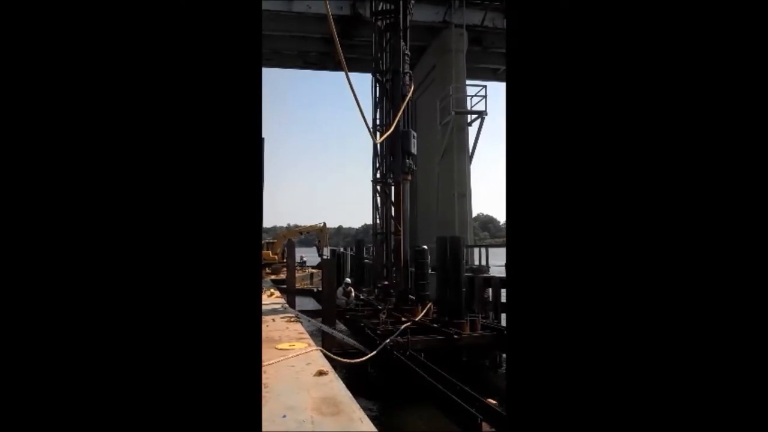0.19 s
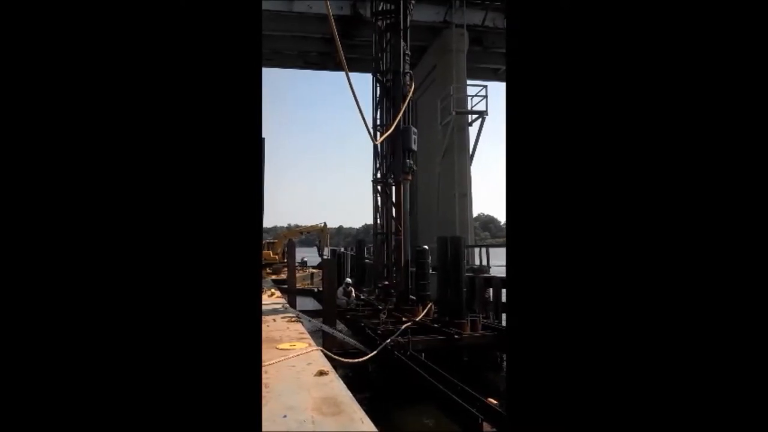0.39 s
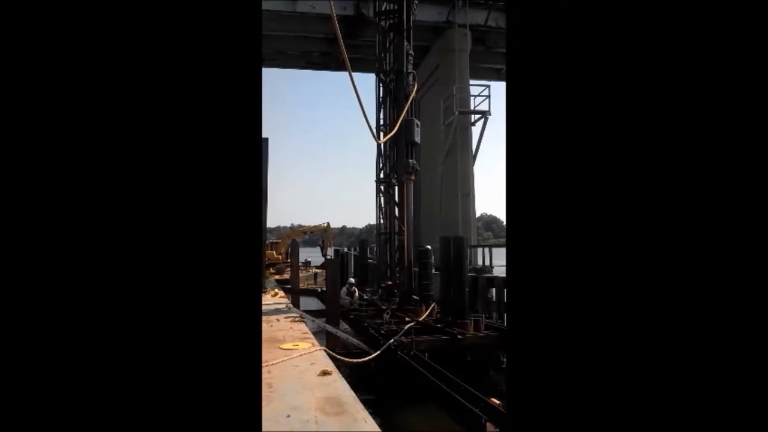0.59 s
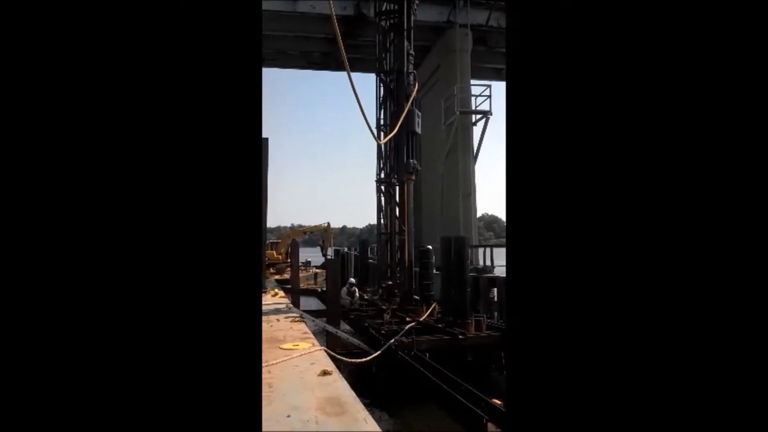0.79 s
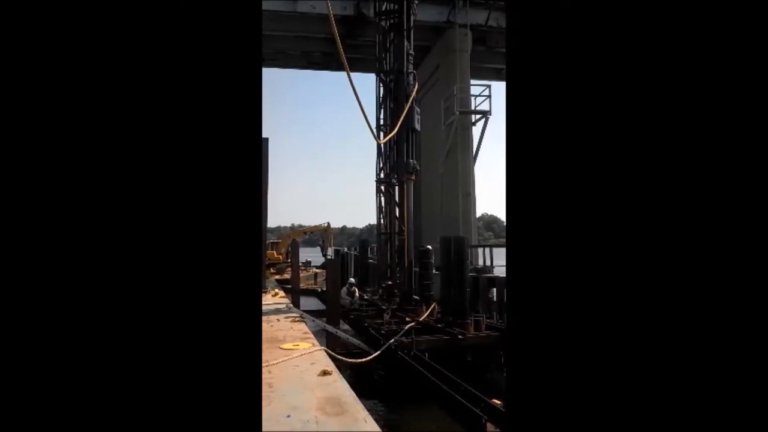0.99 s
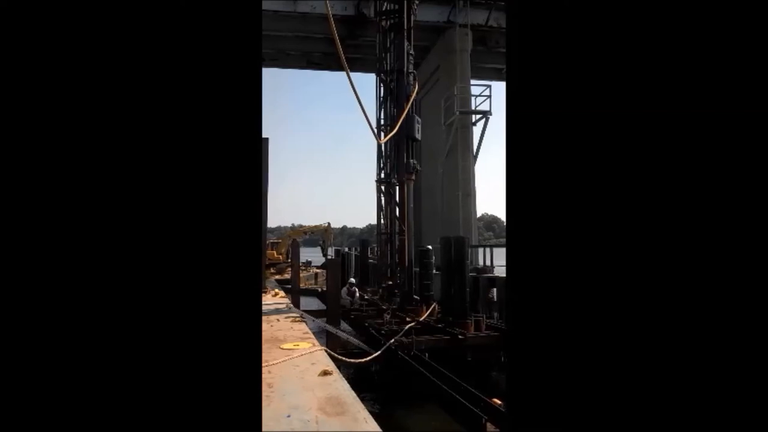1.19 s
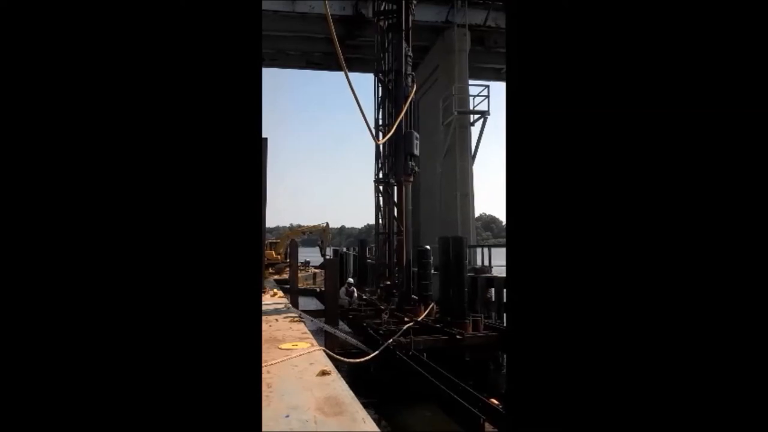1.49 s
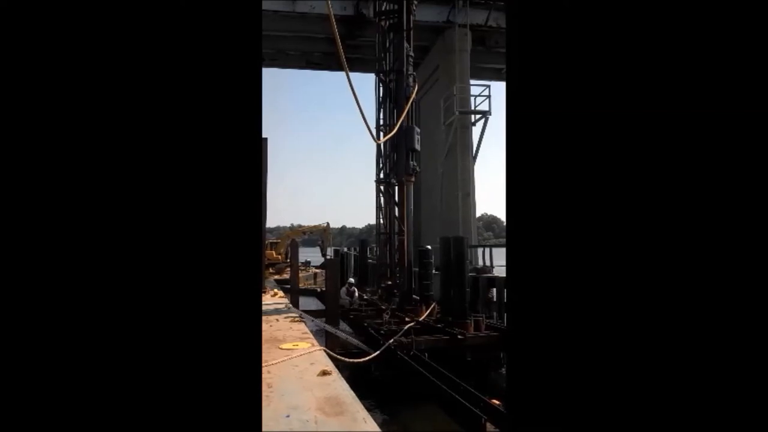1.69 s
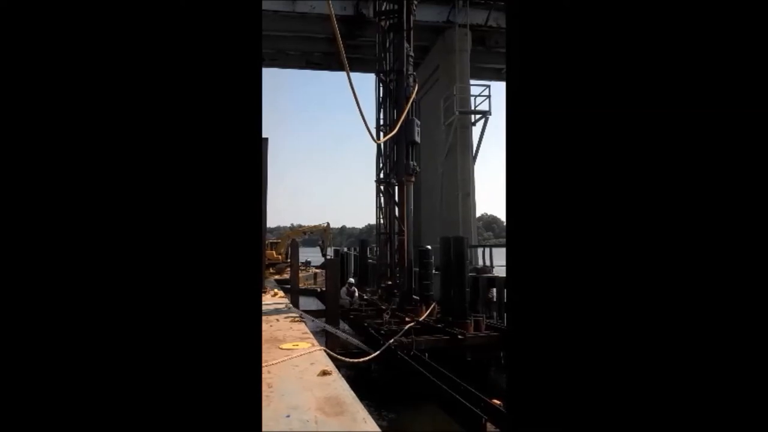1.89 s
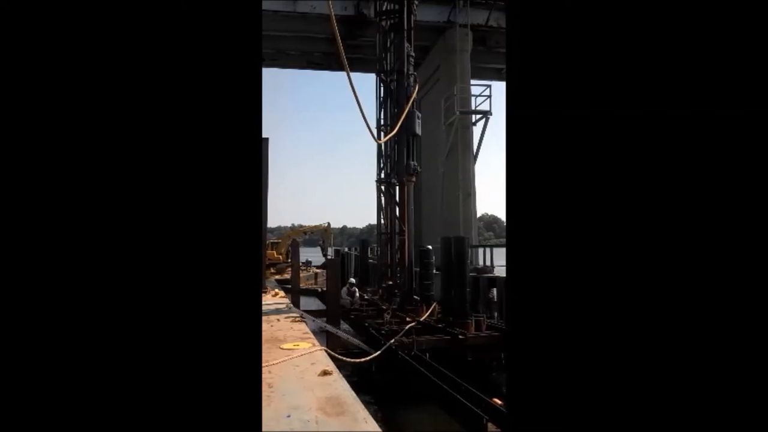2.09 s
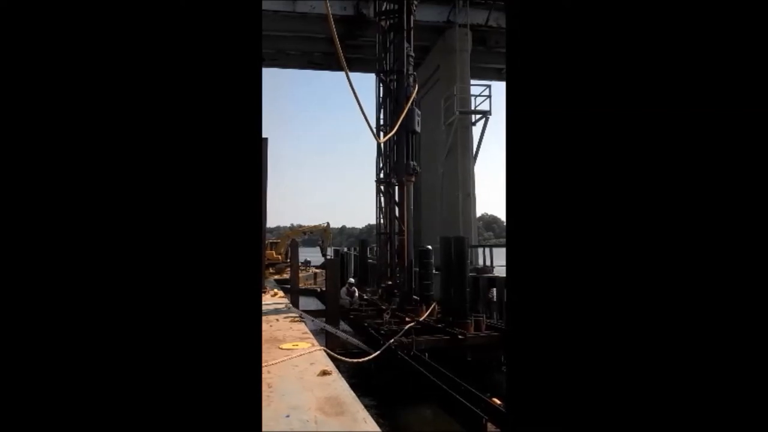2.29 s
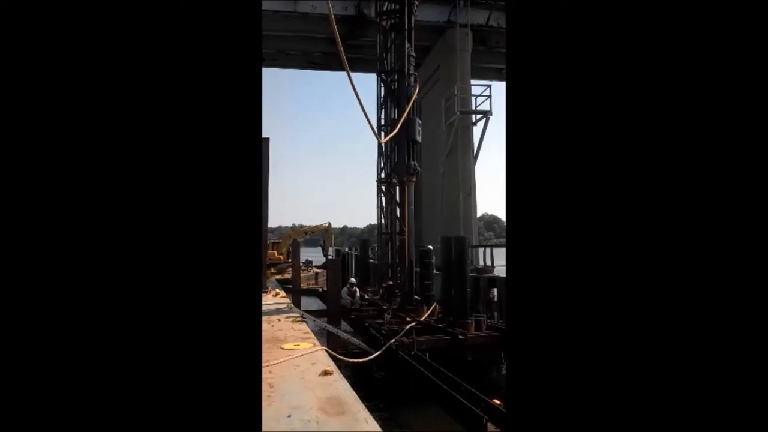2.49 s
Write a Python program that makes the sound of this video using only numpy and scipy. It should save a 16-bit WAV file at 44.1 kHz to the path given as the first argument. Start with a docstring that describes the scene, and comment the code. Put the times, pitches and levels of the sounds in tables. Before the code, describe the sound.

Two loud, heavy pile hammer blows ring on steel, each followed by a hissing rush of air

```python
"""Under a bridge, an air-driven pile hammer strikes twice: the valve spits, the ram cracks on the steel, and the
thud returns from piers and deck. Exhaust air blasts as the ram is lifted, then leaks until the next blow.
Pile and steel are decaying modes driven by pulses and noise; air, clatter and crack are shaped noise.
Site machinery drones behind with faint whines and dull knocks; blows and exhaust excite a long open echo."""
import sys
import numpy as np
from scipy import signal
from scipy.fft import rfft, irfft
from scipy.io import wavfile
from scipy.ndimage import uniform_filter1d

SR = 44100
rng = np.random.default_rng(int(sys.argv[2]) if len(sys.argv) > 2 else 0)


def master_out(mix):
    """Clip the mix to full scale and print it as 16-bit PCM to the path in sys.argv[1]."""
    frames = np.transpose(np.atleast_2d(mix))
    ceiling = np.clip(frames, -1, 1)
    pcm = np.round(ceiling * 32767).astype(np.int16)
    wavfile.write(sys.argv[1], SR, pcm)


N = 114660
T = np.arange(N) / SR  # seconds

# Spectrum of the machinery noise. Each row: frequency in Hz, relative level in dB.
DRONE_SPECTRUM = [(60, -1), (105, 2), (200, 1.3), (320, 0), (700, 1.5), (1300, -7), (2500, -16.5),
                  (5000, -19), (7500, -24), (10000, -34), (13000, -30), (16000, -26.5)]
# Machinery tones. Each row: mean frequency in Hz, amplitude in dB about which it wavers.
WHINES = [(4600, -63), (6554, -67.5)]
# Faint low knocks. Each row: time in seconds, level in dB before a common lift.
KNOCKS = [(0.102, -35), (0.137, -29), (0.783, -39), (1.4, -24.5), (1.419, -28), (1.66, -20.5)]
# Modes of a knock. Each row: frequency in Hz, level in dB, 60 dB decay time in seconds.
KNOCK_MODES = [(188, -9.5, 0.066), (410, -0.5, 0.025)]
# Reverberation of the open site. Each row: frequency in Hz, 60 dB decay time in seconds.
ECHO_DECAY = [(120, 1.09), (250, 0.49), (500, 1.28), (1000, 0.83), (2000, 1), (4000, 0.73), (8000, 0.39),
              (16000, 0.4)]
# Air releases. Each row: start in seconds, length of the steady flow in seconds, level in dB.
EXHAUSTS = [(-.36, .28, -24), (0.905, 0.304, -25), (2.195, 0.285, -25)]
# Spectrum of the exhaust jet. Each row: frequency in Hz, relative level in dB.
JET_SPECTRUM = [(100, -36), (280, -6), (480, -9), (750, 0), (950, -3.5), (1200, -1.5), (1450, -1.5),
                (1900, -4), (2500, -5), (4200, -6), (8000, -12.5), (11000, -23), (16000, -19)]
# Ram strikes. Each row: start in seconds, level in dB, treble level in dB, steel ring level in dB.
BLOWS = [(0.2014, -0.66, 1, 1.5), (1.4748, -0.32, -0.5, -3.5)]
# Repeated arrivals of a blow. Each row: delay in seconds, thud in dB, clatter in dB, treble in dB.
ARRIVALS = [(.001, -11, -21.5, -24), (0.013, -9, -24.5, -59), (0.02, -10, -27.5, -56),
            (.032, -25, -31, -54), (.041, -7.5, -14.5, -48), (0.056, -16, -21.5, -30),
            (.066, -13, -22, -25), (0.077, -11, -20, -39), (0.096, -21.5, -28, -34),
            (0.13, -23, -39, -32.5), (.162, -23, -27, -38)]
# Modes of the pile body. Each row: frequency in Hz, level in dB, 60 dB decay time in seconds.
PILE_MODES = [(139, -10, 0.27), (190, -25.5, 0.093), (244.4, -6.5, 0.23), (307, -1.5, 0.24),
              (338.6, 4, 0.21), (370, -18, 0.18)]
# Modes of leader frame and pile wall. Each row: frequency in Hz, level in dB, 60 dB decay time in seconds.
STEEL_MODES = [(648.5, -10.5, 0.23), (745.7, -6, 0.2), (1012.6, -14, 0.29), (1196, -8.5, 0.26),
               (1397, -12.5, .25), (1811, -42, 0.6), (2042, -6, 0.18), (2065, -19.5, 0.93),
               (2755, -19, 0.15), (2630, -31, 0.092), (4080, -23, .3), (4140, -22, 0.34), (6400, -40, 0.31)]
# Spectrum of the rumble under the thud. Each row: frequency in Hz, relative level in dB.
BOOM_SPECTRUM = [(90, -14), (130, -9), (250, 5.7), (350, 5), (500, -8), (900, -33.5)]
# Spectrum of the clatter. Each row: frequency in Hz, relative level in dB.
CLATTER_SPECTRUM = [(80, -17), (150, -16), (400, 1.5), (800, 1.8), (1500, -2.5), (2500, -9.5), (4500, -20),
                    (8000, -35)]
# Spectrum of the treble fizz. Each row: frequency in Hz, relative level in dB.
TREBLE_SPECTRUM = [(1200, -32), (2500, 3), (4500, 0.8), (8000, -8), (11000, -15.5), (16000, -12.5)]
# Spectrum of the valve's spit. Each row: frequency in Hz, relative level in dB.
SPIT_SPECTRUM = [(200, -22), (800, 0.5), (2000, 1.2), (4500, -6), (8000, -16), (16000, -35)]
# Weight of the far side. Each row: frequency in Hz, weight from 0 to 1.
FAR_SIDE = [(100, .3), (300, .5), (600, .3), (1500, .45), (4000, .5), (9000, .6), (12000, .7)]
# Phase added to the lead between the ports. Each row: frequency in Hz, phase in radians.
PORT_TURN = [(86, -4.7), (172, -4.1), (258, -2.9), (345, -.5), (474, .6), (560, 1.1), (800, 1.2),
             (1000, .7), (1400, 0)]
# Scattered sound, different at each port. Each row: frequency in Hz, linear gain.
SCATTER = [(60, 0.47), (150, 0.64), (280, 0.67), (450, 0.56), (1000, 0.51), (3000, 0.14), (8000, 0.14)]
# Balance of the direct and scattered sound. Each row: frequency in Hz, left minus right in dB.
BALANCE = [(60, 7), (130, -2.5), (250, -6.5), (400, -5.5), (600, -3), (1500, -0.06)]

DRONE_DB, PATCHY_DB = -36.5, 2
KNOCK_LIFT_DB = 4
ECHO_DB, JET_ECHO_DB, ECHO_GAP_S = -10, -9, 0.024
JET_RISE_S, JET_FALL_DB_PER_S, JET_SHUT_S = 0.033, 87.5, 0.02
BLAST_DB, BLAST_T60 = 7, 0.42  # first rush, relative to the steady flow; t60 = 60 dB decay time in s
LEAK_DB, LEAK_T60 = -15, 4.6  # escaping air, relative to the steady flow
THUD_DB, STEEL_DB = -9, -32
BOOM_DB, BOOM_RISE_S, BOOM_T60 = -5.5, 0.0043, 0.075
CLATTER_RISE_S, CLATTER_T60 = 0.0057, 0.14
TREBLE_RISE_S, TREBLE_T60 = 0.003, 0.14
CRACK_HZ, CRACK_EDGE_HZ = 7046, 520  # centre, and distance to the points 30 dB down
CRACK_DB, CRACK_RISE_S, CRACK_T60 = -21.5, 0.00033, 0.045
SNAP_DB, SNAP_RISE_S, SNAP_T60 = -21, 0.001, 0.076
SPIT_DB, SPIT_LEAD_S, SPIT_RISE_S, SPIT_T60 = -27.5, 0.035, 0.007, 0.39
GRAIN_DB, GRAIN_S = 2.5, 0.003  # depth and length of the lumps in clatter and spit
PORT_LAG = 16  # samples between the microphone ports
LOW_CUT_HZ, EDGE_HZ, SOFT_CEILING = 118, 15750, 1.6
MIC_RUMBLE_DB, SHAKEN = -71.5, 19  # quiet level, and its growth per unit of loudness


def gain_of(db):
    """Amplitude ratio from the logarithmic level."""
    return 10 ** (np.asarray(db) / 20)


def evened(x):
    """Normalisation by mean power, to an rms of 1."""
    return x / np.sqrt(np.mean(x ** 2) + 1e-20)


def read(points, hz):
    """Interpolation along a logarithmic frequency axis."""
    f, value = np.transpose(points)
    return np.interp(np.log(hz + 1), np.log(f + 1), value)


def noise(spectrum):
    """Spectral shaping of white noise: two unrelated noises of one colour, joint rms 1."""
    hz = np.fft.rfftfreq(N, 1 / SR)
    white = rfft(rng.standard_normal((2, N)))
    return evened(irfft(white * gain_of(read(spectrum, hz)), N))


def burst(start, rise_s, t60):
    """Transient envelope: a linear rise multiplied by exponential decay."""
    t = np.maximum(T - start, 0)
    return np.minimum(t / max(rise_s, 1e-4), 1) * gain_of(-60 * t / t60)


def ring(modes):
    """Modal superposition: one second of exponentially damped sinusoids."""
    t = T[:SR]
    return sum(gain_of(db - 60 * t / t60) * np.sin(2 * np.pi * hz * t) for hz, db, t60 in modes)


def drone():
    """Superposed engines and compressors far off: patchy broadband noise and faint wavering tones."""
    hz, t, z = signal.stft(noise(DRONE_SPECTRUM), SR, nperseg=1024)
    patches = uniform_filter1d(rng.standard_normal(z.shape[1:]), 10, 0)  # smooth over frequency
    patches = evened(uniform_filter1d(patches, 12, 1))  # smooth over time
    patchy = signal.istft(z * gain_of(PATCHY_DB * patches), SR, nperseg=1024)[1][:, :N]
    bed = gain_of(DRONE_DB) * evened(patchy)
    for hz, db in WHINES:
        waver = evened(uniform_filter1d(rng.standard_normal(N), 3000))
        phase = 2 * np.pi * np.cumsum(hz + 12 * waver) / SR
        bed = bed + gain_of(db + 3.6 * waver) * np.sin(phase)
    return bed


def knocks():
    """Impulse response of two damped modes: faint dull knocks from the near side."""
    taps = np.zeros(N)
    for s, db in KNOCKS:
        taps[round(s * SR)] = gain_of(db + KNOCK_LIFT_DB)
    return signal.fftconvolve(taps, ring(KNOCK_MODES))[:N] * [[1], [0]]


def echo(x):
    """Reverberation by convolution with sparse random taps, each band decaying at its own rate."""
    shape = (2, SR + SR // 2)
    taps = rng.choice([-1., 1.], shape) * (rng.random(shape) < .06)
    hz, t, z = signal.stft(taps, SR, nperseg=512)
    decay = gain_of(-60 * t / read(ECHO_DECAY, hz)[:, None])
    tail = signal.istft(z * decay, SR, nperseg=512)[1]
    tail = tail * np.minimum(np.arange(tail.shape[1]) / (SR * ECHO_GAP_S), 1)  # gradual onset
    return signal.fftconvolve(x, tail / np.linalg.norm(tail[0]), axes=1)[:, :N]


def exhausts():
    """Turbulent jet noise follows the flow: a rush, a sagging flow the valve shuts, a leak until the ram falls."""
    flow = np.zeros(N)
    for s, length, db in EXHAUSTS:
        t = np.maximum(T - s, 0)
        opening = np.minimum(t / JET_RISE_S, 1) ** 2
        shutting = np.clip((length - t) / JET_SHUT_S, 0, 1)
        steady = gain_of(-JET_FALL_DB_PER_S * t) * shutting
        next_blow = min([blow for blow, *_ in BLOWS if blow > s] + [N / SR])
        leak = gain_of(LEAK_DB - 60 * t / LEAK_T60) * (T < next_blow)
        rush = gain_of(BLAST_DB - 60 * t / BLAST_T60)
        flow += opening * gain_of(db) * (steady + leak + rush)
    return flow * noise(JET_SPECTRUM)


def blows():
    """Impact excitation: each arrival pushes the pile's modes, rumbles, and clatters to shake the steel."""
    push, boom, shake, fizz, crack, snap, spit, rung = np.zeros((8, N))
    for s, db, bright_db, ring_db in BLOWS:
        for delay, thud_db, clatter_db, treble_db in ARRIVALS:
            at = s + delay
            clatter = burst(at, CLATTER_RISE_S, CLATTER_T60)
            push[round(at * SR)] += gain_of(db + thud_db)
            boom += gain_of(db + thud_db + BOOM_DB) * burst(at, BOOM_RISE_S, BOOM_T60)
            shake += gain_of(db + clatter_db) * clatter
            rung += gain_of(ring_db + clatter_db) * clatter
            fizz += gain_of(bright_db + treble_db) * burst(at, TREBLE_RISE_S, TREBLE_T60)
        crack += gain_of(db + CRACK_DB) * burst(s, CRACK_RISE_S, CRACK_T60)
        snap += gain_of(db + SNAP_DB) * burst(s, SNAP_RISE_S, SNAP_T60)
        spit += gain_of(db + SPIT_DB) * burst(s - SPIT_LEAD_S, SPIT_RISE_S, SPIT_T60)
    thud = gain_of(THUD_DB) * signal.fftconvolve(push, ring(PILE_MODES))[:N] * [[1], [0]]  # near side only
    rough_drive = rung * rng.standard_normal((2, N))
    steel = signal.fftconvolve(rough_drive, ring(STEEL_MODES)[None], axes=1)[:, :N]
    narrow = [(CRACK_HZ - CRACK_EDGE_HZ, -30), (CRACK_HZ, 0), (CRACK_HZ + CRACK_EDGE_HZ, -30)]
    impact = crack * noise(narrow) + snap * noise([(1000, 3), (5000, -5), (16000, -20)])
    grain = evened(uniform_filter1d(rng.standard_normal(N), round(GRAIN_S * SR)))
    lumps = evened(gain_of(GRAIN_DB * grain))
    rattle = lumps * (shake * noise(CLATTER_SPECTRUM) + spit * noise(SPIT_SPECTRUM))
    rumble = boom * noise(BOOM_SPECTRUM)
    treble = fizz * noise(TREBLE_SPECTRUM)
    return thud + rumble + rattle + treble + gain_of(STEEL_DB) * steel + impact


def scene():
    """Linear superposition: channel 0 arrives from the near side, channel 1 from the far side."""
    background = drone() + knocks()
    air, hit = exhausts(), blows()
    return background + air + hit + echo(gain_of(ECHO_DB) * hit + gain_of(JET_ECHO_DB) * air)


def record(dry):
    """Phase difference between two ports: each side appears inverted and advanced in the other port."""
    hz = np.fft.rfftfreq(N, 1 / SR)
    far = np.clip(read(FAR_SIDE, hz), 0, 1)
    near_side, far_side = rfft(dry) * [np.sqrt(1 - far ** 2), far]
    lead = np.exp(1j * (2 * np.pi * hz * PORT_LAG / SR + read(PORT_TURN, hz)))
    smear = rng.standard_normal((2, 2000)) * gain_of(-np.arange(2000) / 60)  # short decaying noise
    scattered = rfft(smear / np.linalg.norm(smear[0]), N) * read(SCATTER, hz) * rfft(dry)
    pair = np.array([near_side - far_side * lead, far_side - near_side * lead]) + scattered
    tilt = gain_of(read(BALANCE, hz) / 2)
    pair = irfft(pair * [tilt, 1 / tilt], N)
    pair = signal.sosfilt(signal.butter(6, LOW_CUT_HZ, "high", fs=SR, output="sos"), pair)
    pair = SOFT_CEILING * np.tanh(pair / SOFT_CEILING)  # soft overload
    loudness = uniform_filter1d(abs(pair).mean(0), 2000)
    rumble = noise([(20, 0), (60, 2), (100, -1), (200, -40)])
    pair = pair + gain_of(MIC_RUMBLE_DB) * (1 + SHAKEN * loudness) * rumble  # grows with loud sound
    band_limit = signal.firwin(511, EDGE_HZ, window=("kaiser", 9), fs=SR)
    return signal.oaconvolve(pair, band_limit[None], "same")


dry = scene()
out = record(dry)
master_out(out)
```